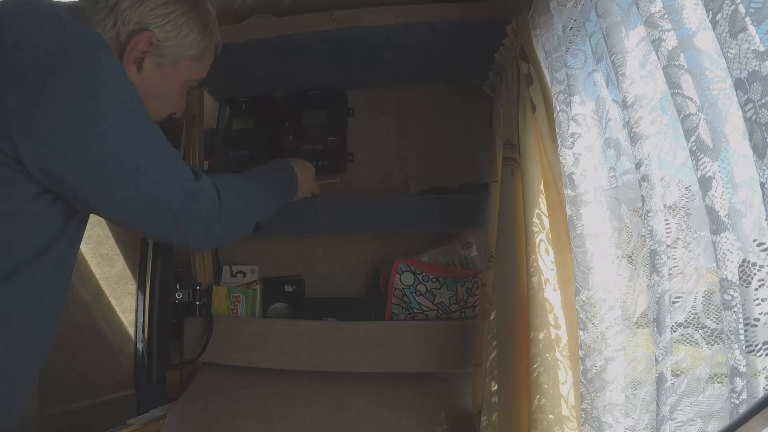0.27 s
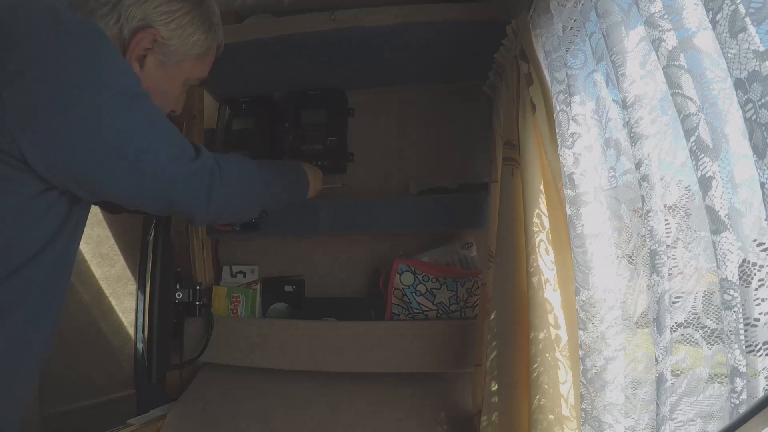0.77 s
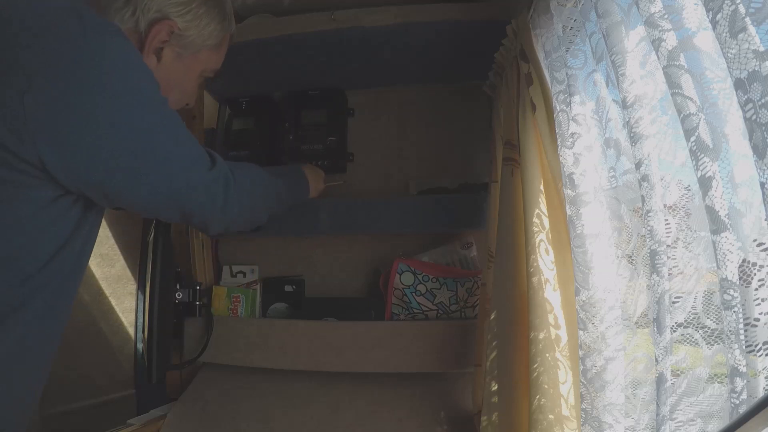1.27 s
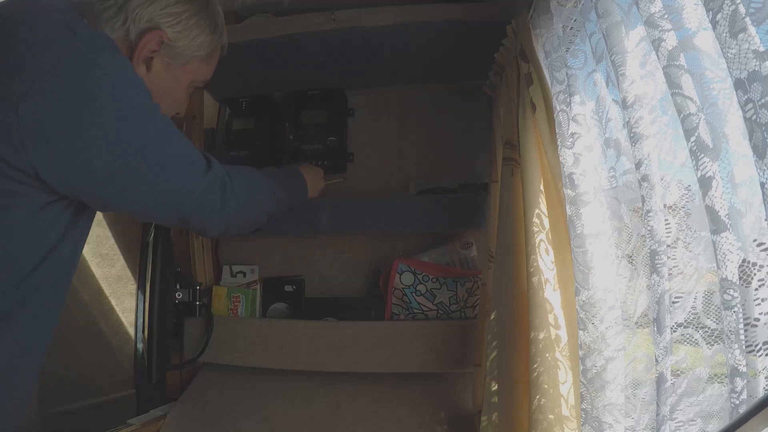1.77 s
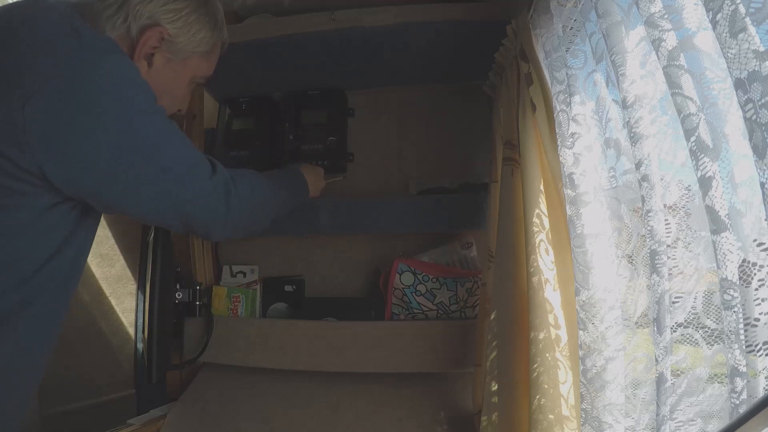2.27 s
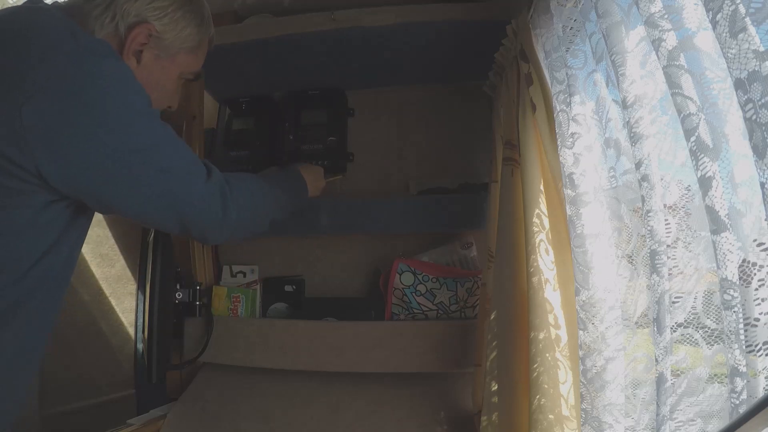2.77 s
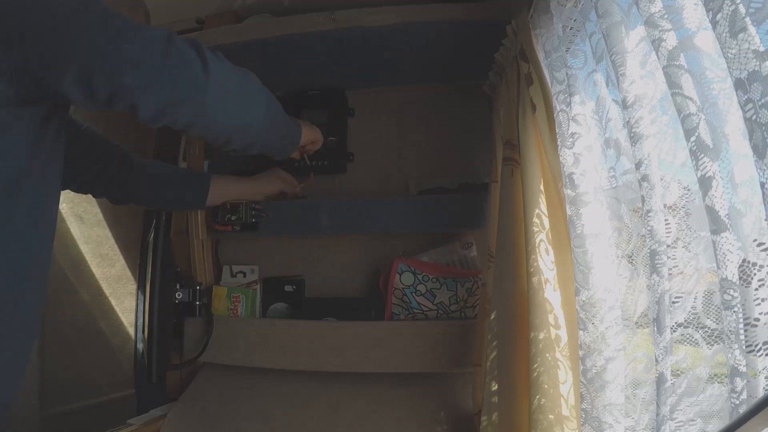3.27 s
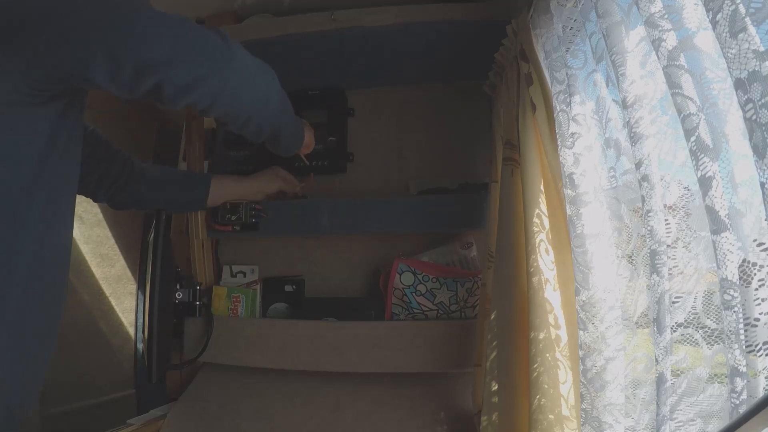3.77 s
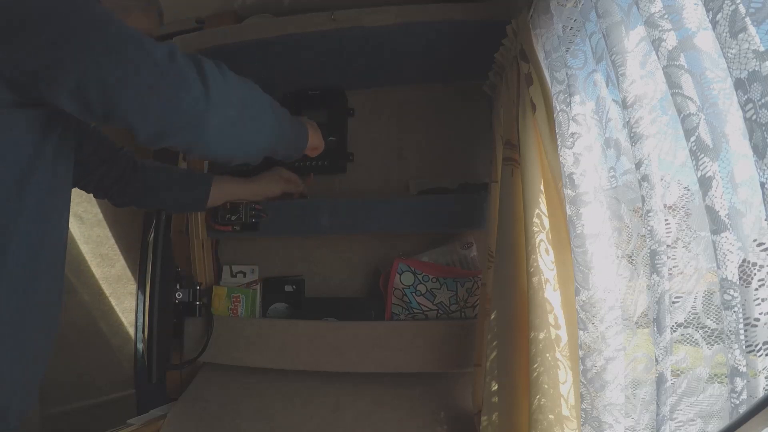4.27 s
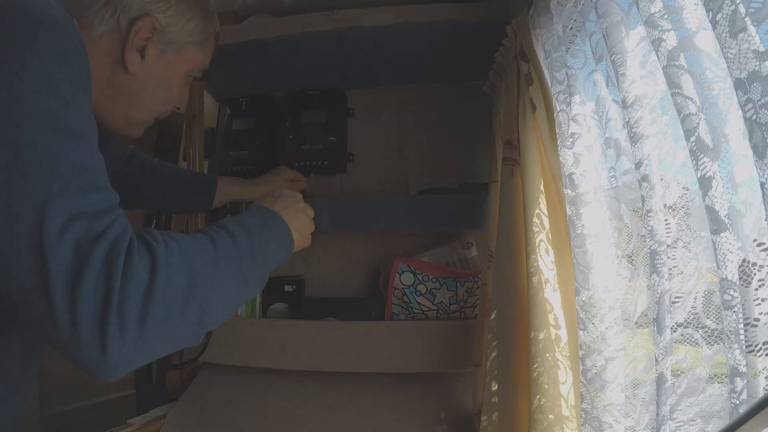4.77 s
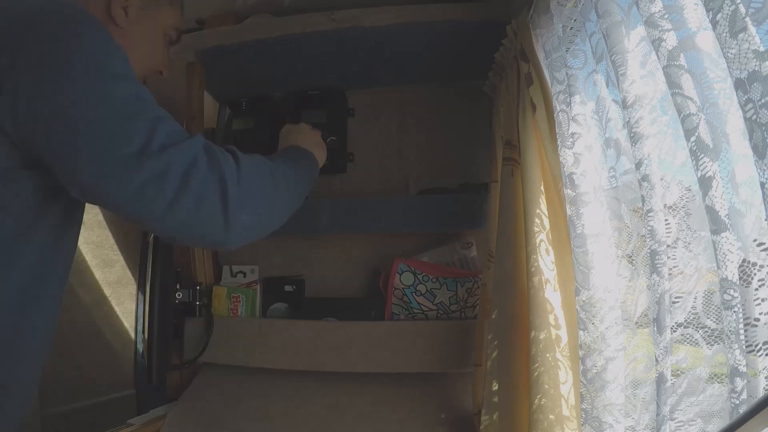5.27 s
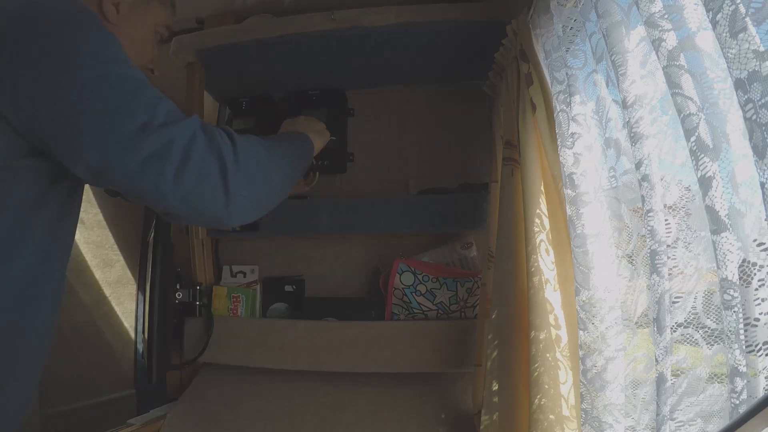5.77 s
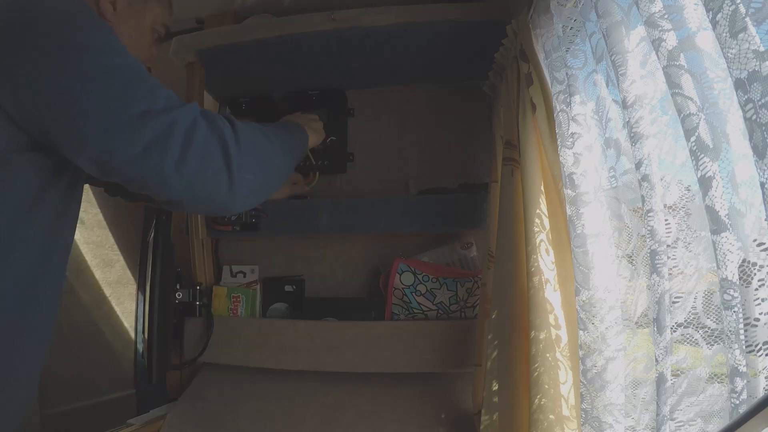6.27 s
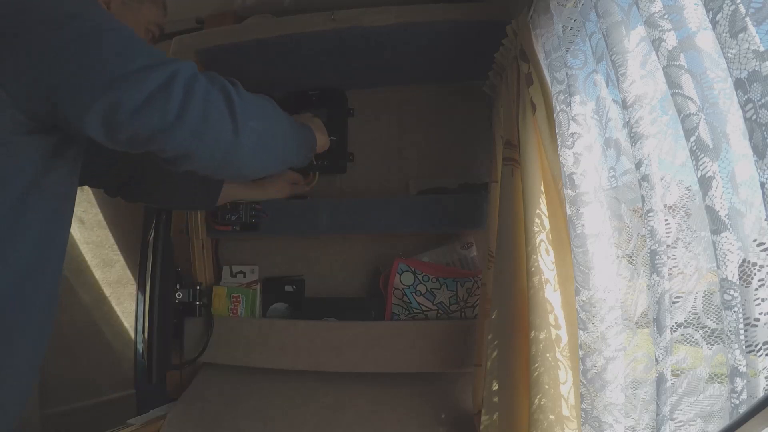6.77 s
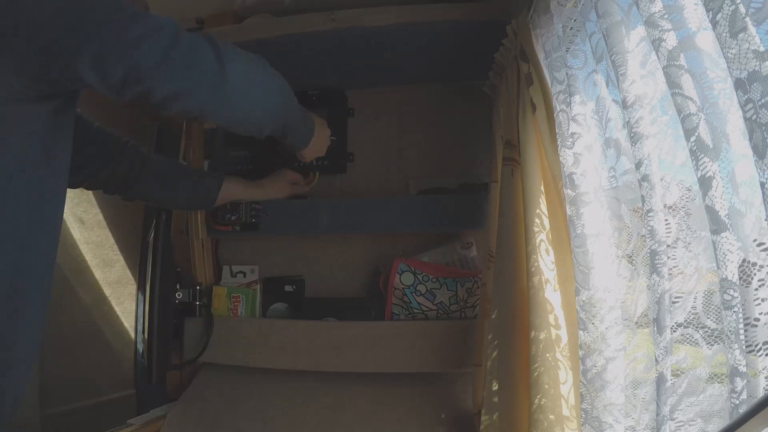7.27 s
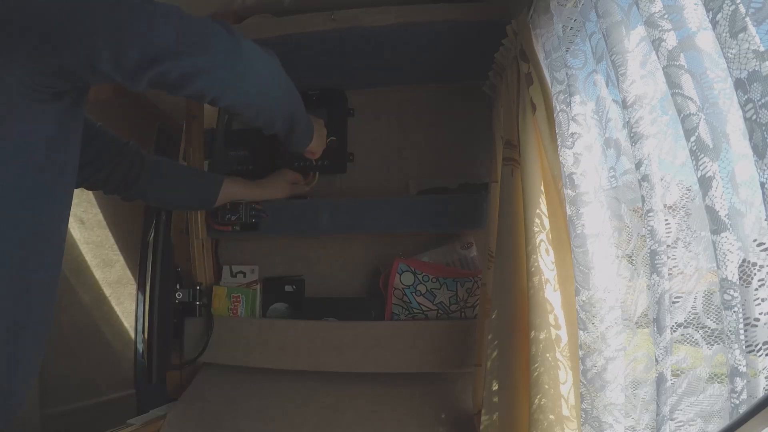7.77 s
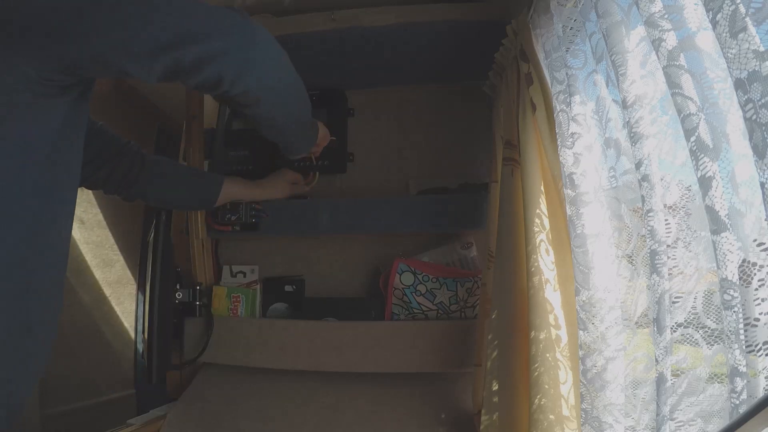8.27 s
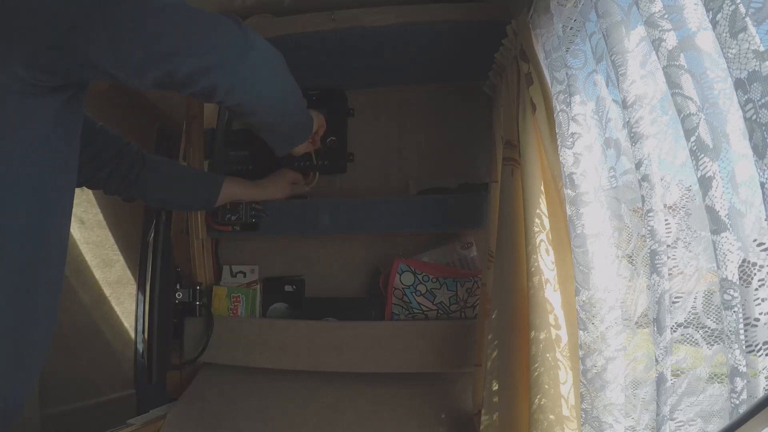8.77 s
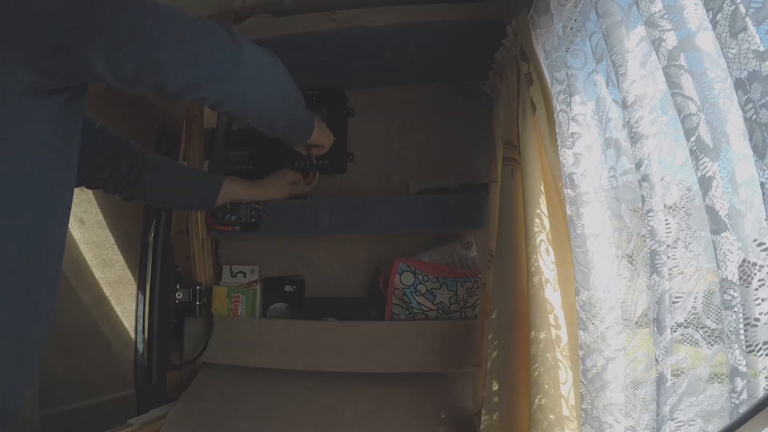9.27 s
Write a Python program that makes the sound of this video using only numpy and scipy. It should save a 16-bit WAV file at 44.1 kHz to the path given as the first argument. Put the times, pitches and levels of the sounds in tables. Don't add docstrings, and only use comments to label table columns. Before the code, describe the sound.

Close tool taps, small screw-slip ticks, soft hollow thumps and brief cloth rubs on a van's wooden panel, growing sharper and louder later.

```python
import sys
import numpy as np
from scipy import signal
from scipy.fft import rfft, irfft, next_fast_len
from scipy.io import wavfile
from scipy.ndimage import uniform_filter1d, map_coordinates

SR = 44100
rng = np.random.default_rng(int(sys.argv[2]) if len(sys.argv) > 2 else 0)


def waveform_to_disk(signal):
    frames = np.transpose(np.atleast_2d(signal))
    scaled = np.clip(frames, -1, 1) * 32767
    samples = np.round(scaled).astype(np.int16)
    wavfile.write(sys.argv[1], SR, samples)


def ratio_of_db(decibels):
    return 10 ** (np.asarray(decibels, float) / 20)


N = 419391

# time_s, level_db
ROCKING_LEVEL = [(0.0, -30.5), (0.13, -37), (0.45, -22), (1.83, -17.5), (2.3, -27), (2.86, -12.5),
                 (3.28, -28), (4.21, -24.5), (4.26, -15), (4.79, -29), (5.16, -18.5), (5.22, -30),
                 (6.17, -23), (6.22, -32), (7.36, -24), (7.68, -39), (7.73, -22), (9.51, -29)]
# time_s, level_db
WEIGHT_SHIFT = [(0.0, -61), (0.32, -35.5), (2.19, -40.5), (3.36, -36.5), (3.71, -46), (6.46, -40.5),
                (9.51, -46)]
# freq_hz, density_db_per_hz
ROCKING_SPECTRUM = [(2, 2), (5, 5.5), (11, 14), (18, 14), (25, -6.5), (33, -31), (45, -64)]
# freq_hz, density_db_per_hz
RUMBLE_SPECTRUM = [(18, -41), (30, -20), (45, -2), (70, -3), (135, -4.5), (250, -19.5), (450, -68)]
# time_s, peak_db, mode_hz, t60_s
SOFT_BLOWS = [(0.177, -14, 180, 0.091), (0.224, -14.5, 220, 0.095), (0.271, -6.5, 71.6, 0.33),
              (1.538, -18, 56.5, 0.082), (1.705, -22, 88, 0.13), (2.236, -18.5, 175, 0.29),
              (2.291, -14, 146, 0.25), (2.524, -18, 96.2, 0.47), (2.803, -11.5, 61, 0.15),
              (2.857, -18.5, 88, 0.13), (3.149, -15.5, 74, 0.13), (3.274, -24, 135, 0.26),
              (3.456, -22.5, 129, 0.12), (3.642, -22, 69, 0.16), (4.049, -27.5, 159, 0.11),
              (4.247, -18, 127, 0.086), (4.3, -26, 56.5, 0.15), (4.98, -23.5, 102, 0.16),
              (5.256, -20, 57, 0.41), (5.31, -16.5, 89, 0.23), (5.871, -19.5, 77, 0.094),
              (6.529, -22.5, 137, 0.23), (6.774, -23, 87.6, 0.14), (6.954, -24, 137, 0.23),
              (7.067, -17, 137, 0.25), (7.654, -24, 56.5, 0.23), (8.038, -23, 57, 0.29),
              (8.109, -25, 71, 0.12), (8.237, -20.5, 134, 0.22), (8.763, -11.5, 133, 0.16)]
# time_s, peak_db, mode_hz, t60_s
KNUCKLE_BLOWS = [
    (1.552, -23.5, 205, 0.11),
    (2.261, -22, 205, 0.14),
    (2.308, -14, 194, 0.16),
    (3.405, -23.5, 172, 0.12),
    (3.52, -26, 209, 0.072),
    (3.652, -24, 190, 0.075),
    (3.985, -25, 204, 0.1),
    (4.058, -22.5, 200, 0.093),
    (7.657, -23, 157, 0.094),
]
# start_s, rise_s, fall_s, peak_db, brightness_db
SLEEVE_STROKES = [(0.18, 0.013, 0.098, -43, 3), (0.262, 0.019, 0.046, -39, -1.5),
                  (0.29, 0.041, 0.11, -40, -1), (0.44, 0.054, 0.072, -45.5, 1),
                  (0.61, 0.063, 0.18, -42, -2.5), (0.79, 0.019, 0.12, -44, -3),
                  (1.02, 0.11, 0.042, -36.5, -8.5), (1.43, 0.096, 0.034, -40.5, -6),
                  (1.67, 0.093, 0.038, -42, -5), (2.84, 0.072, 0.071, -41, 3), (2.95, 0.046, 0.028, -37, 3),
                  (3.7, 0.11, 0.07, -49.5, -23)]
# start_s, rise_s, fall_s, peak_db, brightness_db
DRAG_STROKES = [(1.16, 0.013, 0.13, -39, -2), (1.355, 0.02, 0.029, -28, -1.5),
                (2.21, 0.09, 0.068, -38, -3.5), (2.48, 0.044, 0.042, -34.5, -5.5),
                (3.21, 0.069, 0.04, -31, -9), (3.36, 0.13, 0.059, -48, -5), (3.96, 0.032, 0.15, -43, -3),
                (5.38, 0.011, 0.02, -42, -5), (5.45, 0.028, 0.087, -39, 4.5), (5.78, 0.012, 0.057, -30, -1),
                (6.21, 0.036, 0.046, -42, -12), (6.39, 0.023, 0.052, -37.5, -0.5),
                (7.39, 0.032, 0.1, -37, -18), (8.0, 0.045, 0.048, -35.5, -13),
                (8.07, 0.047, 0.044, -36, -11), (8.615, 0.012, 0.05, -32.5, -19),
                (8.69, 0.04, 0.025, -38.5, -18), (9.205, 0.0094, 0.11, -38, -22)]
# rel_db, brightness_share
SLEEVE_BALANCE = [(0.85, -0.0095), (-7.5, 0.96)]
# rel_db, brightness_share
DRAG_BALANCE = [(-1.7, 1), (-23, 0.46)]
# freq_hz, density_db_per_hz
HELD_SPECTRUM = [(500, -25), (750, 4), (1000, -1.5), (1400, -1.5), (1800, -11.5), (3000, -17), (4500, -49)]
# freq_hz, density_db_per_hz
SWISH_SPECTRUM = [(1200, -33), (2000, 3), (3000, 4.5), (5900, 2), (7500, -5), (8800, -4.5), (10500, -9),
                  (15000, -18), (15500, -60)]
# freq_hz, level_db, t60_s
SHEATH_MODES = [(2970, -1.5, 0.023), (3550, -5, 0.016), (4530, -7, 0.014), (5700, 0, 0.011),
                (6500, 0, 0.01), (8000, 3, 0.009), (8900, 9, 0.0098)]
# time_s, panel_peak_db, low_rel_db, block_rel_db, tip_rel_db
TOOL_KNOCKS = [(0.187, -20, -15, -16.5, -20), (1.125, -15, -12, -0.5, -15.5), (1.168, -22, -15, -20, -36),
               (1.541, -18, -6.5, -5.5, -20), (2.799, -23, -15, -14.5, -9),
               (4.232, -16, -11.5, -1.5, -14.5), (4.24, -13.5, -13, -3.5, -15), (5.313, -17, -14, -9, -15),
               (5.316, -11.5, -6.5, -18, -24), (5.325, -7, -6, -16.5, -26), (5.875, -8, -9, -18, -26.5),
               (6.091, -20.5, -26, 2, -11.5), (6.129, -14.5, -10, -11, -33), (6.533, -7, -14.5, -13, -30),
               (6.778, -11, -13.5, -4.5, -8.5), (6.961, -11, -6.5, -16, -40), (7.071, -2.5, -9, -18.5, -46),
               (7.529, -7, -11.5, -12.5, -21), (8.009, -22, -1, -19, -31), (8.204, -9, -14.5, -14, -18.5),
               (8.235, -21.5, -1, -10, -30), (8.626, -17.5, 1, -18.5, -36), (8.767, -6.5, -0.5, -2.5, -13)]
# time_s, panel_peak_db, hardness_db
SCREW_SLIPS = [(0.273, -27.5, -10), (1.641, -26, -10), (1.76, -37, -7), (2.52, -34, -9), (3.084, -33, -10),
               (3.146, -31, -4), (4.262, -19.5, -12), (4.622, -46, 3.5), (5.683, -27.5, -0.5),
               (5.773, -24, -4), (5.93, -23.5, 0.4), (6.371, -30.5, 1), (6.676, -30.5, -11),
               (7.657, -26, -3)]
# time_s, panel_peak_db, low_rel_db
WALL_TOUCHES = [(0.81, -38, -1.5), (1.326, -31, -8), (1.36, -29, -4), (1.577, -29, 0.5), (1.836, -24.5, 2),
                (2.189, -32.5, -8), (2.222, -34, -8.5), (3.355, -30.5, 4), (3.43, -35.5, 0),
                (3.458, -33.5, 1), (3.52, -40, -1), (4.03, -35.5, -6), (5.265, -34.5, -1),
                (5.435, -30.5, -6), (6.417, -30.5, 0.5), (6.651, -23, -7.5), (7.388, -27, -9),
                (8.024, -26, -7), (8.046, -34.5, 8.5), (8.11, -23, 0.5), (8.176, -30, 2.5),
                (8.591, -26.5, -6), (8.66, -37, 9), (8.705, -41, -7), (9.355, -24, -14),
                (9.377, -25.5, 1.5), (9.39, -27.5, -10)]
# freq_hz, level_db, t60_s
LOW_MODES = [(232.4, -5.5, 0.11), (341, -8.5, 0.12), (402.5, 1, 0.068), (483, 0, 0.097), (556, -4, 0.093)]
# freq_hz, level_db, t60_s
PANEL_MODES = [(648, -7, 0.13), (792, -0.5, 0.083), (969, -2, 0.073), (1098, -13, 0.13), (1200, -6, 0.042),
               (1323, -4, 0.033), (1413, -8, 0.05), (1520, -4.5, 0.017), (1610, 4, 0.0045), (1700, 1, 0.05)]
# freq_hz, level_db, t60_s
BLOCK_MODES = [(1980, -4, 0.061), (2256, -4.5, 0.053), (2546, -3.5, 0.041), (2896, -11.5, 0.062),
               (3278, -3.5, 0.029), (3627, -13.5, 0.034), (3915, -9.5, 0.027), (4530, -8.5, 0.02)]
# freq_hz, density_db_per_hz
PANEL_DENSE = [(450, -5.5), (700, 3), (1000, -3), (1500, 0), (1900, -16.5), (2600, -49)]
# freq_hz, density_db_per_hz
BLOCK_DENSE = [(1500, -9), (2000, -7.5), (2450, 2), (2850, -3), (3250, -1.5), (4500, -5.5), (5500, -18),
               (7000, -49)]
# freq_hz, density_db_per_hz
TIP_SPECTRUM = [(3800, -23), (5200, 0), (8400, -4), (11000, -12), (15000, -19), (16400, -38)]
# freq_hz, density_db_per_hz
HISS_SPECTRUM = [(16, -8), (28, -8), (42, -9.5), (65, -10.5), (130, -27), (238, -25), (14300, -48),
                 (15500, -50)]


def unit(x):
    return x / np.sqrt(np.mean(x ** 2) + 1e-20)


def peak_one(x):
    return x / np.abs(x).max()


def level_curve(rows):
    time_s, level_db = np.transpose(rows)
    return np.interp(np.arange(N) / SR, time_s, level_db)


def wobble(rate_hz):
    knots = rng.standard_normal(int(N * rate_hz / SR) + 4)
    return map_coordinates(knots, [np.arange(N) * rate_hz / SR])


def coloured(x, spectrum):
    size = next_fast_len(len(x) + 8192)
    hz, db = np.transpose(spectrum)
    log_hz = np.log(np.fft.rfftfreq(size, 1 / SR) + 0.064)
    gain = ratio_of_db(np.interp(log_hz, np.log(hz), db, left=-120))
    return unit(irfft(rfft(x, size) * gain, size)[:len(x)])


def below(x, top_hz):
    return irfft(rfft(x) * (np.fft.rfftfreq(len(x), 1 / SR) < top_hz), len(x))


def ring(modes, t, spread_db, detune=0.0):
    hz, db, t60_s = np.transpose(modes)[:, :, None]
    sign_luck, level_luck, tune_luck = rng.standard_normal((3, len(modes), 1))
    wave = np.sin(2 * np.pi * hz * (1 + detune * tune_luck) * t)
    decay = ratio_of_db(db + spread_db * level_luck - 60 * t / t60_s)
    return peak_one(np.sum(np.sign(sign_luck) * decay * wave, 0))


def struck(response, force):
    return peak_one(signal.fftconvolve(response, force)[:len(response)])


def wash(spectrum, t, rise_s, t60_s):
    noise = coloured(rng.standard_normal(len(t)), spectrum)
    return peak_one(noise * (1 - np.exp(-(t / rise_s) ** 2)) * ratio_of_db(-60 * t / t60_s))


def add_at(out, start_s, sound):
    out[max(round(start_s * SR), 0):][:len(sound)] += sound


def van_body():
    after_thump_db, after_thump_t60_s = -16, 0.39
    rumble_db = 0.85
    t = np.arange(N) / SR
    load = ratio_of_db(rumble_db + level_curve(WEIGHT_SHIFT))
    for start_s, peak_db, *_ in SOFT_BLOWS:
        load += (t > start_s) * ratio_of_db(peak_db + after_thump_db - 60 * np.abs(t - start_s) / after_thump_t60_s)
    rocking = coloured(rng.standard_normal(N), ROCKING_SPECTRUM)
    power = np.abs(uniform_filter1d(rocking ** 2, size=9000))
    rocking = unit(rocking / np.sqrt(power + 0.11))
    rumble = coloured(rng.standard_normal(N), RUMBLE_SPECTRUM)
    rumble = unit(ratio_of_db(3.4 * wobble(15)) * rumble)
    return ratio_of_db(level_curve(ROCKING_LEVEL)) * rocking + load * rumble


def thumps():
    out, t = np.zeros(N + SR), np.arange(SR // 2) / SR
    for start_s, peak_db, hz, t60_s in SOFT_BLOWS + KNUCKLE_BLOWS:
        modes = [(hz, 0, t60_s), (hz * 1.6, -9, t60_s), (hz * 0.71, -14, t60_s)]
        push = np.gradient(np.exp(-3.5 * hz * t) * (hz * t) ** 2)
        thump = struck(ring(modes, t, spread_db=5), push)
        add_at(out, start_s + 0.002, ratio_of_db(peak_db + 1.5) * thump)
    return out[:N]


def strokes():
    edge_db = -15
    t, gains = np.arange(N) / SR, np.zeros((3, N))
    for rows, balance in ((SLEEVE_STROKES, SLEEVE_BALANCE), (DRAG_STROKES, DRAG_BALANCE)):
        for start_s, rise_s, fall_s, peak_db, bright_db in rows:
            top_s = start_s + rise_s
            u = np.interp(t, [start_s, top_s, top_s + fall_s], [0, 1, 0])
            shape = np.clip(u / 0.14, 0, 1) * ratio_of_db(peak_db + edge_db * (1 - u))
            layer_db = [0] + [rel_db + share * bright_db for rel_db, share in balance]
            gains += shape * ratio_of_db(layer_db)[:, None]
    return gains


def rubbing():
    low_gain, upper_gain, swish_gain = strokes()
    slips = ratio_of_db(3.04 * wobble(60) + 2.9 * wobble(300))
    t = np.arange(SR // 8) / SR
    held_modes = [(hz, db, t60_s * 0.39) for hz, db, t60_s in LOW_MODES]
    held = ring(held_modes, t, spread_db=-1)
    low = unit(signal.oaconvolve(slips ** 0.45 * rng.standard_normal(N), held)[:N])
    upper = coloured(slips * rng.standard_normal(N), HELD_SPECTRUM)
    swish = coloured(slips ** 0.36 * rng.standard_normal(N), SWISH_SPECTRUM)
    sheath = unit(signal.oaconvolve(swish, ring(SHEATH_MODES, t, spread_db=-4))[:N])
    swish = unit(swish + ratio_of_db(-5.5) * sheath)
    return ratio_of_db(2.5) * low_gain * low + ratio_of_db(1.0) * upper_gain * upper + ratio_of_db(3.0) * swish_gain * swish


def contacts():
    knock_s, slip_s, touch_s = 0.0031, 0.0041, 0.0034
    slip_low_db, slip_tip_db = -6.5, -11
    touch_block_db, touch_tip_db = -14, -30
    knocks = [(*row, knock_s) for row in TOOL_KNOCKS]
    slips = [(s, db, slip_low_db, hard_db, hard_db + slip_tip_db, slip_s) for s, db, hard_db in SCREW_SLIPS]
    touches = [(s, db, low_db, touch_block_db, touch_tip_db, touch_s) for s, db, low_db in WALL_TOUCHES]
    return sorted(knocks + slips + touches)


def low_wall(t, chatter_s, force):
    low = ring(LOW_MODES, t, spread_db=1, detune=0.0224)
    swell = 1 - np.exp(-(t / chatter_s) ** 2)
    return ratio_of_db(-1) * low * swell + ratio_of_db(-8) * struck(low, force)


def panel_ring(t, chatter_s, force):
    modes = struck(ring(PANEL_MODES, t, spread_db=-2, detune=0.011), force)
    return ratio_of_db(-4) * modes + wash(PANEL_DENSE, t, 0.54 * chatter_s, 0.029 + 11 * chatter_s)


def block_ring(t, chatter_s, force):
    dense = wash(BLOCK_DENSE, t, 0.27 * chatter_s, 0.025 + 8 * chatter_s)
    modes = struck(ring(BLOCK_MODES, t, spread_db=2, detune=0.015), force)
    return ratio_of_db(-3) * dense + ratio_of_db(-5.5) * modes


def tip_crack(t, chatter_s):
    crack = wash(TIP_SPECTRUM, t, 0.12 * chatter_s, 6 * chatter_s)
    return crack + ratio_of_db(-12.5) * wash(TIP_SPECTRUM, t, 0.0016, 0.068)


def taps():
    out, t = np.zeros(N + SR), np.arange(SR // 8) / SR
    for start_s, peak_db, low_db, block_db, tip_db, chatter_s in contacts():
        u = t / chatter_s
        force = rng.standard_normal((2, len(t))) * np.sqrt(u) * np.exp(-1.6 * u)
        tap = panel_ring(t, chatter_s, force[1])
        tap += ratio_of_db(low_db + 8.5) * low_wall(t, chatter_s, force[0])
        tap += ratio_of_db(block_db + 6.5) * block_ring(t, chatter_s, force[0])
        tap += ratio_of_db(tip_db + 10) * tip_crack(t, chatter_s)
        add_at(out, start_s - 0.0015, ratio_of_db(peak_db - 2.5) * tap)
    return out[:N]


def scene():
    return (van_body() + thumps() + rubbing() + taps())[None]


def microphone_hiss():
    hiss_db, top_hz = -40.5, 15350
    return ratio_of_db(hiss_db) * below(coloured(rng.standard_normal(N), HISS_SPECTRUM), top_hz)


def roll_off(x):
    return signal.sosfilt(signal.butter(12, 16480, fs=SR, output="sos"), x)


def record(dry):
    ceiling, top_hz = 0.95, 16400
    rounded = dry[0] / (1 + np.abs(dry[0] / ceiling) ** 6) ** (1 / 6)
    mix = below(rounded, top_hz)[None] + microphone_hiss()
    return roll_off(mix)


dry = scene()
out = record(dry)
waveform_to_disk(out)
```